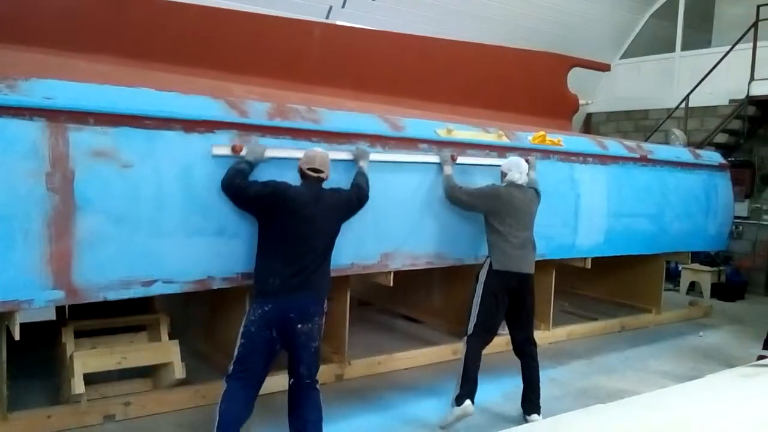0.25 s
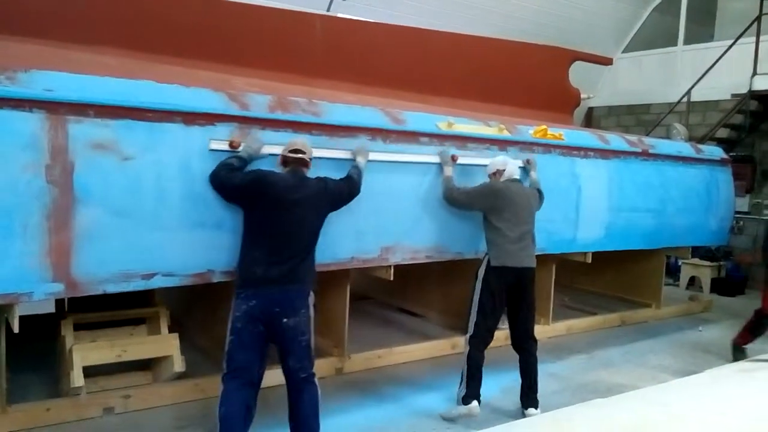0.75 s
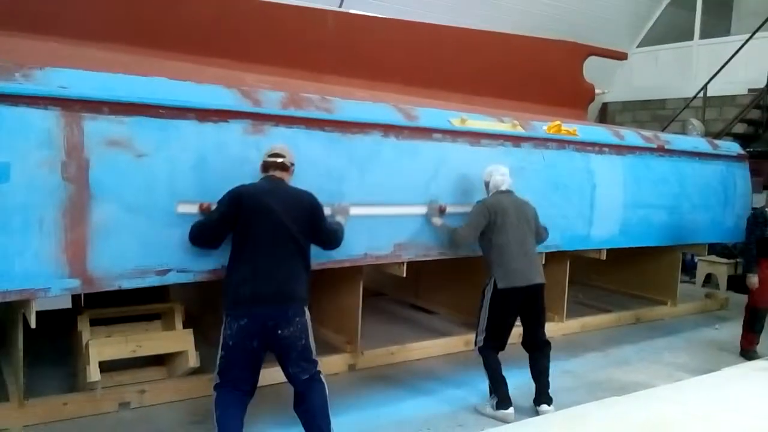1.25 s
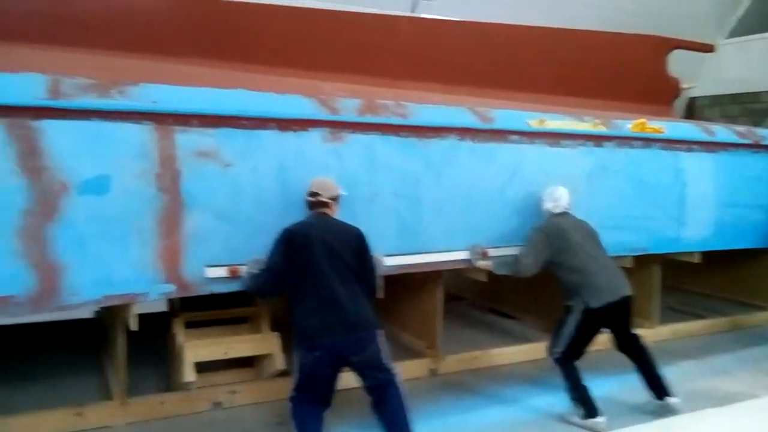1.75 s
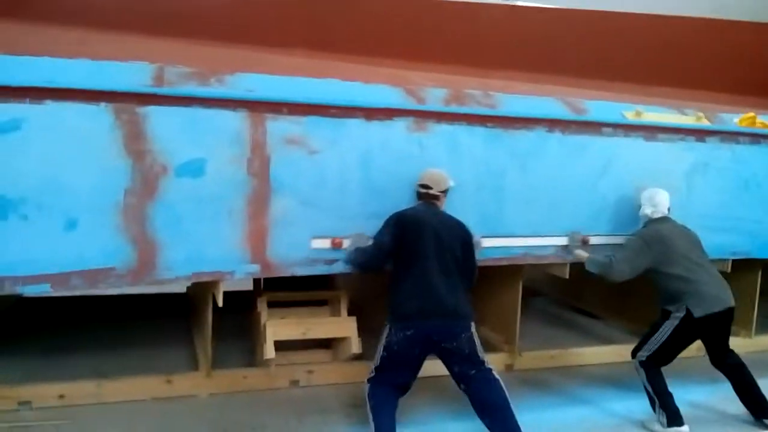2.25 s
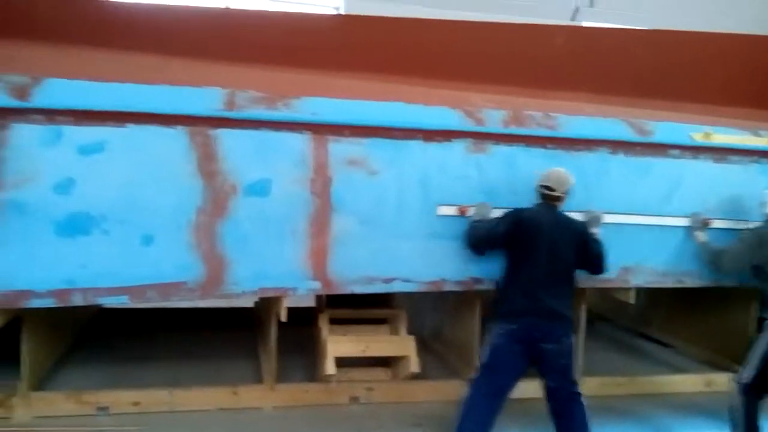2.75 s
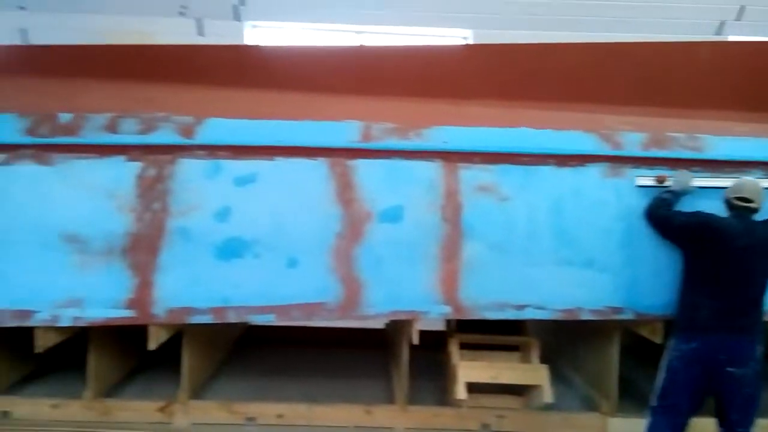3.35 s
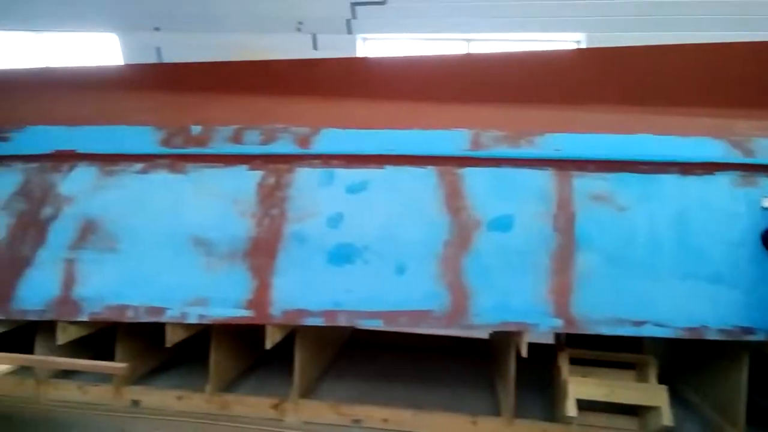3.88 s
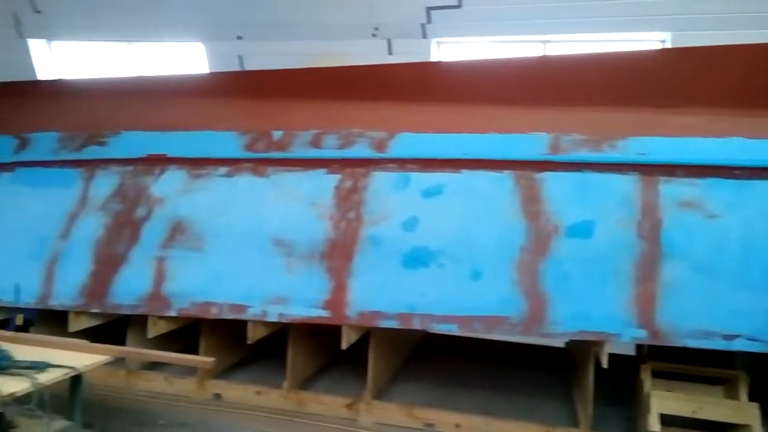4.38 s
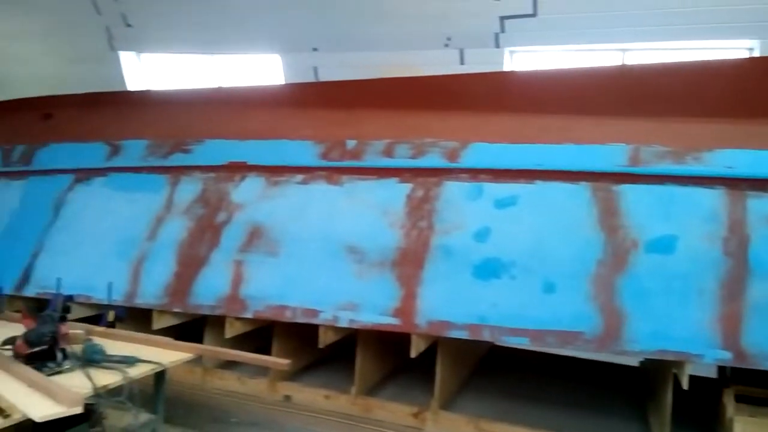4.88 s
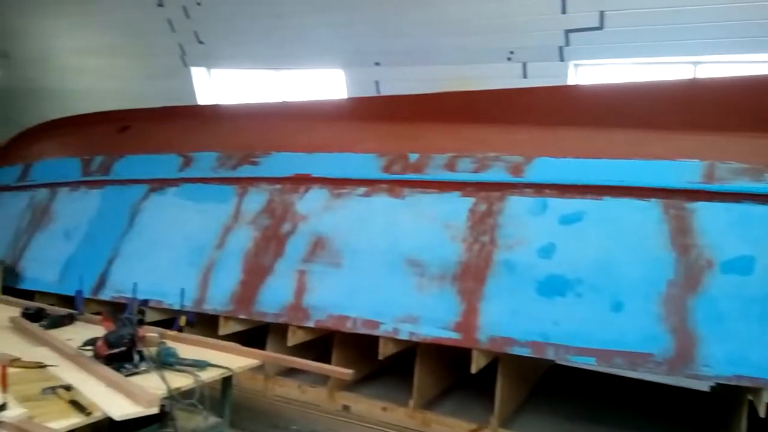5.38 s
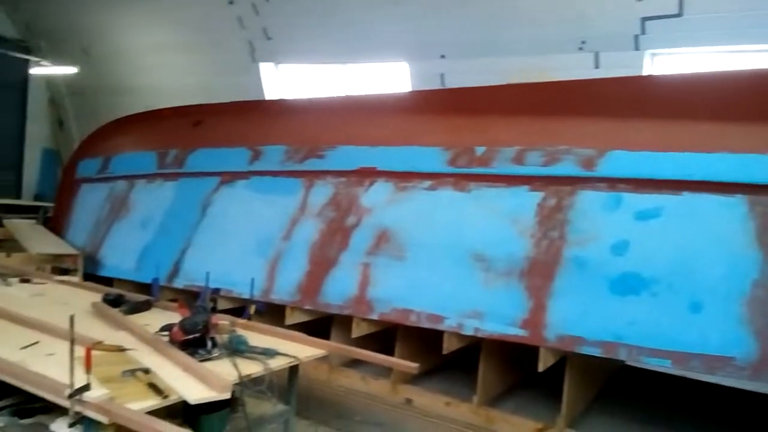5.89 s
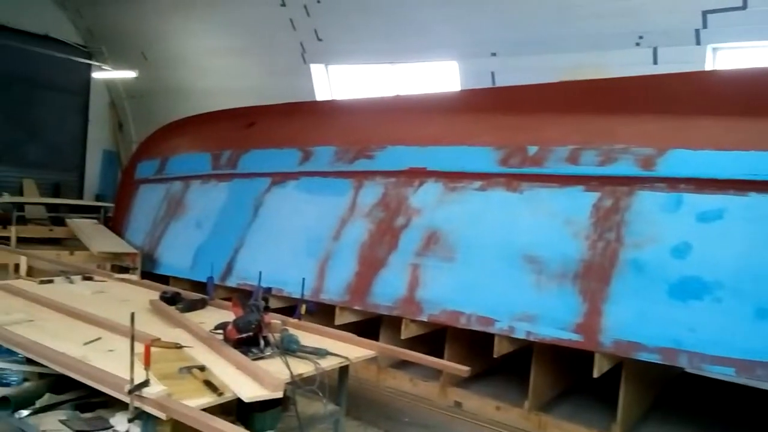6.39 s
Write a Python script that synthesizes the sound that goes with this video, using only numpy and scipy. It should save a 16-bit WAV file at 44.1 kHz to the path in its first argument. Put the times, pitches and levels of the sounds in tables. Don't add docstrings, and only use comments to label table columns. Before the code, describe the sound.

Coarse abrasive scraping swells and dies in slow back-and-forth strokes on a hollow hull, interrupted by a sharp plank clatter, in a large reverberant hall.

```python
import sys
import numpy as np
from scipy import signal
from scipy.fft import rfft, irfft
from scipy.io import wavfile
from scipy.ndimage import uniform_filter1d, map_coordinates

SR = 44100
rng = np.random.default_rng(int(sys.argv[2]) if len(sys.argv) > 2 else 0)


def int16_out(signal):
    q = np.round(np.clip(np.atleast_2d(signal).T, -1, 1) * 32767)
    wavfile.write(sys.argv[1], SR, q.astype(np.int16))


def elevation(decibels):
    levels = np.asarray(decibels, float)
    return 10 ** (levels / 20)


N = 292383


def level(x, db):
    return x * elevation(db) / np.sqrt(np.mean(x ** 2))


def on_log(hz, table):
    f, v = np.transpose(table)
    return np.interp(np.log(np.maximum(hz, 1)), np.log(f), v)


def region_weight(hz, centres_hz, k):
    return on_log(hz, list(zip(centres_hz, np.arange(len(centres_hz)) == k)))


def shaped(x, gain):
    return irfft(rfft(x) * gain(np.fft.rfftfreq(len(x), 1 / SR)), len(x))


def lifts(hz, modes):
    return sum(db / (1 + (2 * (hz - f) / width) ** 2) for f, width, db in modes)


def walk(rate_hz):
    hold = int(SR / rate_hz)
    steps = np.repeat(rng.standard_normal(N // 50), hold)[:N]
    slewed = uniform_filter1d(uniform_filter1d(steps, hold), hold)
    return slewed / slewed.std()


def patches(hz, t, octaves, seconds):
    grid = rng.standard_normal((400, 400))
    rows, cols = np.meshgrid(np.log2(1 + hz / 60) / octaves, t / seconds, indexing="ij")
    field = map_coordinates(grid, [rows, cols], order=3, mode="wrap")
    return field / field.std()


def ring(hz, t60, phase=0.):
    t = np.arange(30000) / SR
    return np.sin(2 * np.pi * hz * t + phase) * np.exp(-np.log(1000) * t / t60)


def swell(sound, ms):
    rise = np.arange(len(sound)) / (SR * ms / 1000)
    return sound * np.clip(rise, 0, 1) ** 2


def add(x, s, sound):
    i = int(s * SR)
    x[i:i + len(sound)] += sound[:len(x) - i]


def strokes(t):
    # (time [s], scrape level [dB], weight leaning on the board [dB])
    up_1 = [(0.0, -40.5, -4), (0.11, -41, -4.5), (0.22, -42.5, -2.5), (0.27, -40, -4.5),
            (0.34, -45.5, -1.5), (0.4, -45, -4.5), (0.459, -57.5, 6.5), (0.5, -73, 4.5), (0.7, -81, -6)]
    down_1 = [(0.83, -73, -4.5), (0.98, -56.5, -5.5), (1.11, -45.5, -3), (1.44, -44, -3.5),
              (1.73, -49, -0.5), (1.79, -49, -3), (1.83, -62, 8), (1.98, -75.5, 2), (2.18, -87, -6)]
    up_2 = [(2.27, -56, -4.5), (2.36, -56.5, 3), (2.42, -48, 0.5), (2.68, -42.5, 2.5), (2.81, -36.5, 3.5),
            (2.9, -39, 6.5), (3.27, -40.5, 2.5), (3.45, -47.5, 3.5), (3.551, -68, 5)]
    down_2 = [(3.69, -79, -3), (3.95, -64.5, -5.5), (4.08, -51.5, -4.5), (4.19, -48, -3), (4.5, -46, -9),
              (4.65, -48, -8.5), (4.7, -52, -3.5), (4.89, -58, -4), (5.02, -77.5, 0.5)]
    nudge = [(5.19, -83, -12), (5.262, -59.5, -7.5), (5.31, -60, -1.5), (5.36, -65.5, -2.5),
             (5.42, -58, -0.5)]
    up_3 = [(5.45, -48.5, -2), (5.54, -48.5, 1), (5.59, -44, -1.5), (5.91, -41, -2.5), (6.09, -39.5, -4),
            (6.27, -42.5, 0), (6.32, -49.5, 5), (6.42, -62, 6), (6.63, -79, -8)]
    # (start [s], fresh dust [dB], patch at start [Hz], patch at end [Hz], patch lift [dB])
    landings = [
        (0.0, 0.5, 2220, 2230, 3),
        (0.72, 6.5, 3000, 2860, 1.5),
        (2.2, 2.5, 2300, 2230, 0.5),
        (3.74, 9.5, 1900, 2930, 4),
        (5.2, 0.5, 2400, 2640, 1),
    ]
    # (panel level [dB], dust level [dB], easing off [s], trailing dust [dB])
    stretches = [
        (-1, 0.5, 0.57, 0),
        (1.5, 0.4, 1.86, 7),
        (-0.5, 0.2, 3.9, 3),
        (2.5, 1.5, 4.9, -1.3),
        (1.7, 0.5, 6.37, 8.5),
    ]
    # (time [s], board lift [dB], panel lift [dB], fade [s])
    shakes = [(.8, -1.8, 17, 0.13), (1.05, -3.5, 7, 0.11), (1.58, -4, 6.5, 0.37), (2.69, 11, 17, 0.027),
              (2.72, 1, 11, 0.32), (2.95, 13.5, 10, 0.038), (3.01, 8, 15.5, .15), (4.1, -1.2, 2.5, 0.19),
              (4.55, 4.5, 5, .12), (4.78, 3.5, 6, .1), (5.48, 2, 4.5, 0.088)]
    full_speed_db = -44.5
    slow_span_db, hard_span_db = 29.5, 6
    fresh_s, trail_s = 0.31, 0.038

    s, scrape_db, weight_db = np.transpose(up_1 + down_1 + up_2 + down_2 + nudge + up_3)
    scrape_db, weight_db = np.interp(t, s, scrape_db), np.interp(t, s, weight_db)
    slow_db = np.clip(full_speed_db - scrape_db, -hard_span_db, slow_span_db)

    start_s, fresh_db, from_hz, to_hz, lift_db = np.transpose(landings)
    k = np.clip(np.searchsorted(start_s, t, side="right") - 1, 0, None)
    since_s = t - start_s[k]
    part = since_s / np.diff(np.append(start_s, N / SR))[k]
    patch_hz = from_hz[k] + (to_hz - from_hz)[k] * part

    board_shake, panel_shake = 0, 0
    for at_s, board_lift_db, panel_lift_db, fade_s in shakes:
        fade = (t >= at_s) * np.exp(-np.maximum(t - at_s, 0) / fade_s)
        board_shake = board_shake + board_lift_db * fade
        panel_shake = panel_shake + panel_lift_db * fade

    panel_db, dust_db, ease_s, trail_db = np.transpose(stretches)[:, k]
    flutter = 2.3 * np.interp(t, np.arange(N) / SR, walk(14))
    panel = panel_db + flutter - 4.0 + 0.48 * slow_db + 1.12 * weight_db + panel_shake
    board = -1.5 + 0.4 * slow_db + weight_db + board_shake
    fresh = fresh_db[k] * np.exp(-(since_s / fresh_s) ** 2)
    trail = trail_db * np.exp(-((t - ease_s) / trail_s) ** 2)
    dust = dust_db - 1.0 + 0.2 * slow_db + 0.1 * weight_db + fresh + trail
    return scrape_db, [panel, board, 0 * t, dust], (patch_hz, 700, lift_db[k])


def sanding():
    # (frequency [Hz], density [dB per Hz])
    grit = [(24, -71), (40, -19.5), (136, -41), (183, -13.5), (333, -12.5), (460, -16), (795, -7.5),
            (947, -9.5), (1680, -2.5), (2570, -2.5), (3730, -3.5), (5150, -10), (8070, -21.5), (10600, -38),
            (15400, -44.5)]
    region_hz = [260, 950, 2800, 8500]
    # (frequency [Hz], width [Hz], lift [dB])
    board_modes = [(800, 360, 2.5), (1140, 134, -1), (1260, 160, 1.5), (1755, 88, 2), (1946, 160, -2),
                   (2240, 170, 1.5), (2540, 45, 3), (3710, 230, -0.5)]
    # (frequency [Hz], width [Hz], lift [dB])
    panel_modes = [(180, 21.7, 12), (290, 18, 3)]

    slips = rng.standard_normal(N) * elevation(1.67 * rng.exponential(size=N))
    hz, t, z = signal.stft(slips, SR, nperseg=1024, noverlap=768)
    scrape_db, shares, contact = strokes(t)
    db = (on_log(hz, grit) + lifts(hz, board_modes + panel_modes))[:, None]
    for k, share in enumerate(shares):
        db = db + np.outer(region_weight(hz, region_hz, k), share)
    db = db + lifts(hz[:, None], [contact])

    patchy = 1 / (1 + (hz[:, None] / 6000) ** 2)
    patchy = patchy * np.interp(scrape_db, [-62, -46], [1.9, .65])
    db = db + patchy * (1.48 * patches(hz, t, .09, .1) + 1.64 * patches(hz, t, 0.2198, .06))
    z = z * elevation(db)

    scrape_band = (hz > 1500) & (hz < 5000)
    scrape_rms = np.sqrt(np.mean(np.sum(np.abs(z[scrape_band]) ** 2, axis=0)))
    out = signal.istft(z, SR, nperseg=1024, noverlap=768)[1][:N] / scrape_rms
    drag_db = 0.56 * walk(30)
    return out * elevation(np.interp(np.arange(N) / SR, t, scrape_db) + drag_db)


def catches():
    # (time [s], peak [dB], pitch [Hz], t60 [s])
    catch_events = [(.25, -40.5, 2200, 0.087), (.37, -47.5, 2205, 0.089), (3.9, -64, 2280, 0.12),
                    (4.001, -62, 1900, 0.13), (1.785, -49, 2010, 0.051), (2.76, -45, 2300, 0.17),
                    (2.829, -43, 1714, 0.09), (3.139, -43.5, 1740, 0.12), (4.219, -42.5, 1754, 0.067),
                    (5.24, -76, 1254, 0.11), (5.274, -60.5, 1570, 0.1), (5.30, -67, 4860, 0.15),
                    (5.44, -45, 2417, 0.067), (5.47, -51, 2240, 0.095), (5.49, -56, 800, 0.099),
                    (5.845, -40, 2624, 0.068)]
    out = np.zeros(N)
    for s, db, hz, t60 in catch_events:
        rough = ring(hz, t60) + 0.42 * ring(hz * 0.94, t60, phase=2.9)
        add(out, s, elevation(db + 11) * swell(rough, 14.5))
    return out


def plank():
    # (time [s], peak [dB], boom share [dB], crack pitch [Hz], crack rise [ms])
    knocks = [
        (2.685, -24.5, -19, 889, 6.9),
        (2.716, -36.5, -4, 740, 4.),
        (2.9478, -36, -44, 910, 2.2),
        (2.9530, -27.5, -6.5, 1066, 1.8),
        (3.011, -29, -13.5, 736, 7.1),
        (3.021, -43, -4, 754, 2.6),
        (3.05, -33.5, -13, 1130, 4.2),
        (3.078, -29.5, -22, 993, 5.4),
        (3.139, -31, -39, 910, 6.2),
        (3.212, -44, -8, 730, 5.),
    ]
    # (ratio to crack pitch [1], level [dB], t60 [s])
    crack_modes = [(0.798, -4.5, 0.034), (1.003, 3, 0.037), (1.17, -8, .04), (1.7, -22, 0.027)]
    # (frequency [Hz], level [dB], t60 [s])
    boom_modes = [(60, -14, .05), (84, -6, 0.063), (165, -6, 0.079), (291, 0, 0.088), (386, 2, 0.096),
                  (501, 2, 0.059)]
    out = np.zeros(N)
    chance = rng.standard_normal((len(knocks), 2, 6))
    for (s, db, boom_db, hz, rise_ms), (a, b) in zip(knocks, chance):
        crack, boom = 0, 0
        for (ratio, mode_db, t60), d, e in zip(crack_modes, a, b):
            crack = crack + elevation(mode_db + 1.7 * d) * ring(hz * ratio, t60, phase=3 * e)
        for (mode_hz, mode_db, t60), d, e in zip(boom_modes, b, a):
            boom = boom + elevation(mode_db + 2.1 * d) * ring(mode_hz * (1 + 0.02 * e), t60)
        blow = elevation(db + 4) * swell(crack, rise_ms) + elevation(db + boom_db - 0.5) * swell(boom, 8.8)
        add(out, s, blow)
    return out


def thuds():
    # (time [s], peak [dB], pitch [Hz], t60 [s])
    thud_events = [(.56, -77, 180, 0.21), (0.866, -60.5, 194, 0.048), (1.54, -69, 109, 0.065),
                   (1.74, -46.5, 97, 0.072), (1.81, -56.5, 149, 0.1), (1.91, -62, 168, .08),
                   (1.99, -57.5, 165, 0.056), (2.218, -67, 180, 0.076), (2.629, -62, 195, 0.085),
                   (1.775, -56, 90, .1), (2.719, -46, 290, 0.091), (2.774, -51, 277, 0.085),
                   (3.02, -46.5, 291, 0.19), (2.976, -52, 167, 0.11), (3.09, -50, 84, 0.11),
                   (3.151, -59, 80, 0.11), (4.129, -67, 175, 0.071), (4.55, -68, 150, 0.14),
                   (4.75, -64, 199, 0.093), (4.929, -63.5, 187, 0.064), (5.36, -73, 187, 0.086),
                   (5.44, -65, 190, .08), (5.719, -72, 193, 0.066), (6.1, -68, 120, 0.085)]
    out = np.zeros(N)
    for s, db, hz, t60 in thud_events:
        add(out, s - .012, elevation(db + 11.5) * swell(ring(hz, t60), 13.7))
    return out


def tink():
    # (time [s], peak [dB], pitch [Hz], t60 [s])
    tink_event = (2.037, -94, 8410, 1.1)
    out = np.zeros(N)
    s, db, hz, t60 = tink_event
    pair = ring(hz, t60) + .3 * ring(hz + 11, t60, phase=-2.)
    add(out, s, elevation(db + 5) * swell(pair, 3.6))
    return out


def shed(x, delay_s):
    # (frequency [Hz], t60 [s])
    decay_bands = [(60, 0.63), (250, 1), (1000, 0.91), (3000, 0.66), (8000, 0.28), (15000, 0.8)]
    t = np.arange(SR + SR // 2) / SR
    noise, tail = rng.standard_normal(len(t)), 0
    centres_hz = [f for f, _ in decay_bands]
    for k, (_, t60) in enumerate(decay_bands):
        band = shaped(noise, lambda hz: region_weight(hz, centres_hz, k))
        tail = tail + band * np.exp(-np.log(1000) * t / t60)
    tail = tail * np.clip(t / delay_s, 0, 1)
    return signal.fftconvolve(x, tail / np.sqrt(np.sum(tail ** 2)))[:N]


def air():
    # (frequency [Hz], density [dB per Hz])
    air_spectrum = [(15, -25), (25, 1), (71, -13.5), (160, -11), (221, -7.5), (468, -15.5), (581, -12),
                    (682, -28), (2110, -11), (10600, -41), (15400, -46)]
    hiss = shaped(rng.standard_normal(N), lambda hz: elevation(on_log(hz, air_spectrum)))
    return level(hiss, -74.5) * elevation(walk(1.83))


def scene():
    board = sanding() + catches()
    blows = plank()
    small = thuds() + tink()
    wet = shed(elevation(-12.0) * board + elevation(-4.5) * blows + elevation(-13.0) * small, delay_s=0.036)
    return (board + blows + small + wet + air())[None]


def top_cut(x):
    return signal.sosfilt(signal.butter(12, 15700, fs=SR, output="sos"), x)


def record(dry):
    # (frequency [Hz], width [Hz], lift [dB])
    port_modes = [(6640, 600, -2.5), (7860, 1000, 2)]
    bass_cut = signal.butter(2, 90, "high", fs=SR, output="sos")
    heard = signal.sosfilt(bass_cut, dry)
    heard = shaped(heard[0], lambda hz: elevation(lifts(hz, port_modes)))[None]
    rumble = level(shaped(rng.standard_normal(N), lambda hz: 1 / (1 + (hz / 30) ** 2)), -96)
    offset = -.0003
    return top_cut(heard + rumble + offset)


dry = scene()
out = record(dry)
int16_out(out)
```